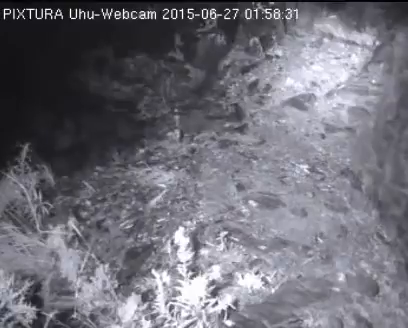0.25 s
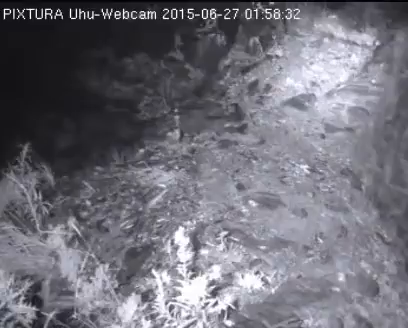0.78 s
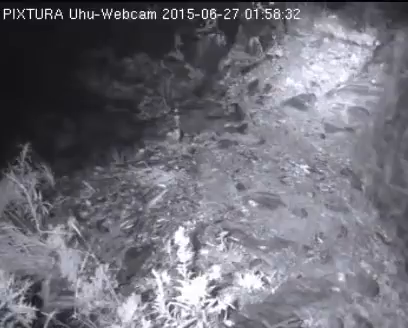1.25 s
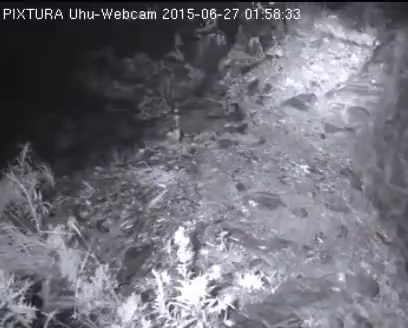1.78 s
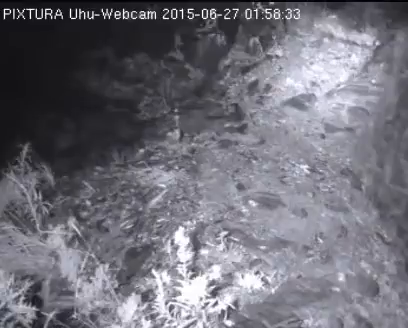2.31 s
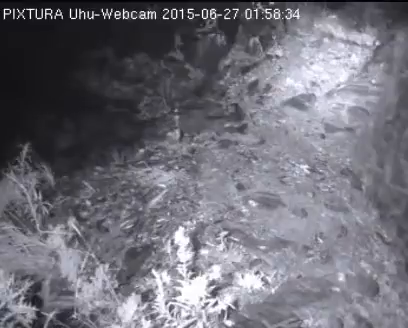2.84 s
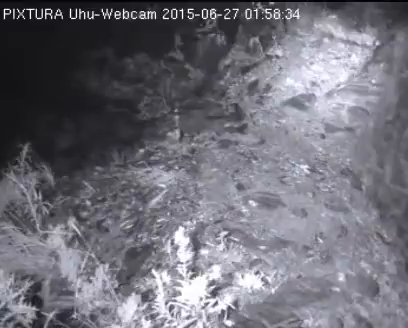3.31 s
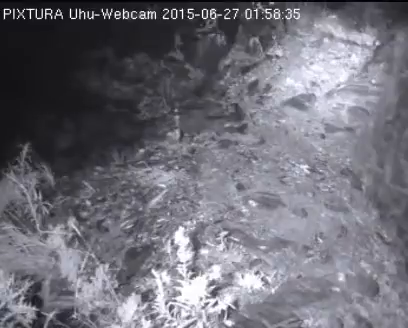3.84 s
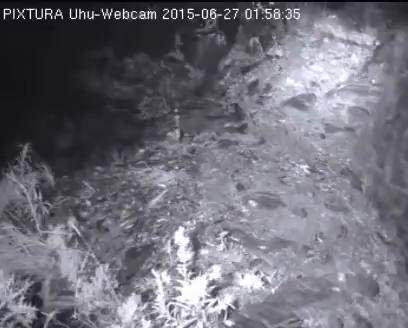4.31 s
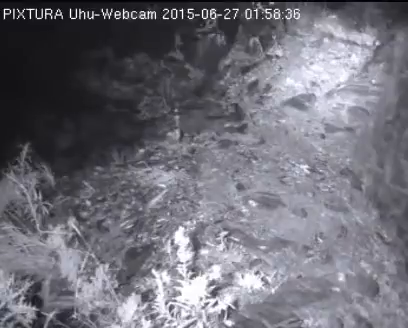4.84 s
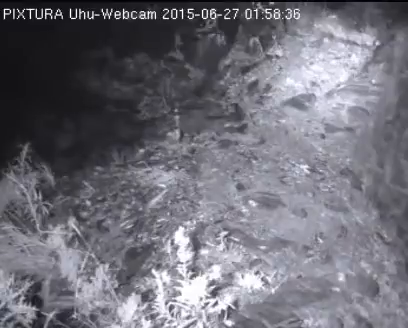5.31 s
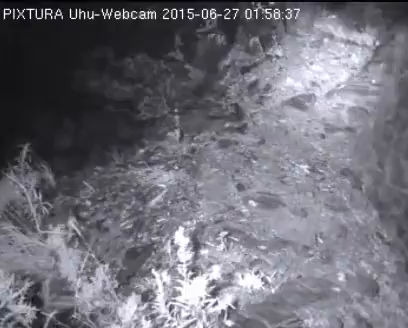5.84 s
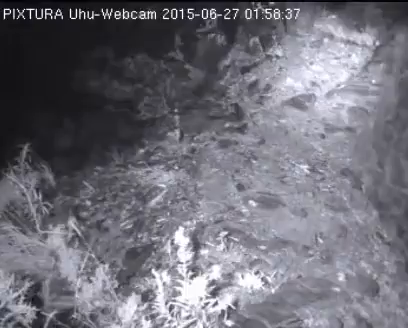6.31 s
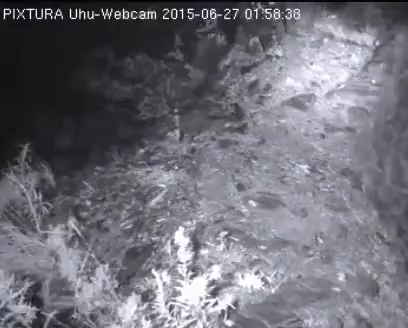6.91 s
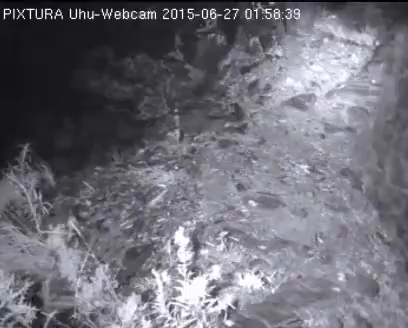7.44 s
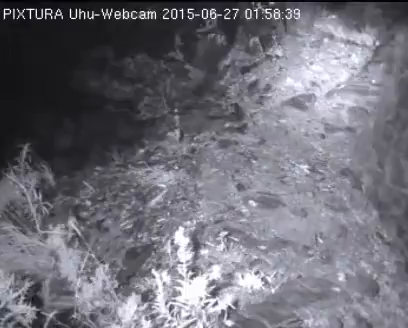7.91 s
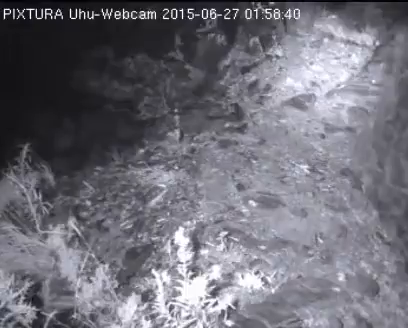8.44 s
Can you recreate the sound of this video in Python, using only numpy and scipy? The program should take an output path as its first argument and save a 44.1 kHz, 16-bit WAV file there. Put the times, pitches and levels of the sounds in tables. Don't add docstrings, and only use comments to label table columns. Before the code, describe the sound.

Young owls beg on a rocky slope at night. After quiet hiss, a short hoarse rasp comes, with a faint gasp just after; a second, similar rasp follows about a second later. A long pause holds only a tiny tick, then one much louder, harsher rasp distorts the input. Close rocks add brief reflections. A cheap outdoor camera microphone gives dull treble, steady hiss and low hum.

```python
import sys
import numpy as np
from scipy import signal
from scipy.fft import rfft, irfft
from scipy.io import wavfile
from scipy.ndimage import uniform_filter1d

SR = 44100
rng = np.random.default_rng(int(sys.argv[2]) if len(sys.argv) > 2 else 0)


def materialize(psi):
    bounded = np.clip(np.atleast_2d(psi).T, -1, 1)
    quanta = np.round(bounded * 32767).astype(np.int16)
    wavfile.write(sys.argv[1], SR, quanta)


def voltage_ratio(decibels):
    exponent = np.asarray(decibels, float) / 20
    return 10 ** exponent


N = 382788

# (full effort reached [s], held [s], effort [dB], syrinx pitch [Hz], release [dB/s])
RASPS = [
    (2.512, .1, -18, 1035, 250),
    (3.852, .078, -19.5, 985, 162),
    (7.695, .09, -8.5, 1040, 390),
    (2.705, .04, -35.5, 1000, 148),
]
OWL = [0, 1, 2, 0]
# (note re effort [dB], whistle re effort [dB], lowest whistle [Hz], its climb [Hz],
# whistle end after full effort [s])
VOICING = [
    (-16, -7.5, 3670, 30, 0.067),
    (-16.5, 4, 2165, 115, 0.077),
    (-24, -4, 3430, 430, 0.08),
    (-31, -3, 3600, 28, .06),
]
# (level re effort when voiced [dB], loss when unvoiced [dB])
CHEST = [(2, 7), (-2, 9.5), (-5.5, 1), (-10, 2.5)]
# (centre [Hz], width [Hz], level [dB])
LOWER_THROAT = [
    [(1560, 450, -17), (1950, 150, -10.5), (2120, 104, -7), (2380, 300, 2.5)],
    [(1900, 170, -2), (2260, 260, 4.5)],
    [(1620, 350, -1.5), (2090, 660, -7), (2585, 280, 9.5)],
]
# (centre [Hz], width [Hz], level [dB])
UPPER_THROAT = [
    [(2746, 130, 1), (3110, 580, -4), (3680, 220, -4), (4000, 500, -10.5), (4780, 840, -14),
     (6850, 1600, -21)],
    [(2600, 360, 1.5), (3010, 230, 4.5), (3400, 460, 1.5), (4080, 670, -3.5), (4850, 1200, -12),
     (5600, 1400, -15.5)],
    [(2806, 290, -4), (3404, 490, -0.5), (3810, 270, 1), (4170, 420, -3.5), (5150, 1020, -9),
     (7150, 6900, -22)],
]
FAR_FACE_DB = [-14.5, -29, -23]
# (time [s], pitch [Hz], level [dB])
SQUEAK = [
    (4.012, 3000, -45),
    (4.025, 2600, -34),
    (4.04, 2010, -38),
    (4.052, 1800, -47),
]
# (time [s], peak level [dB])
TICKS = [
    (5.614, -29),
    (4.1, -36),
]
# (frequency [Hz], density [dB per Hz])
HISS = [(25, -36), (45, -11.5), (70, -12.5), (110, -5), (250, -5.5), (400, 0.26), (700, -3), (1400, -4.5),
        (2100, -7), (3300, -9.5), (4600, -12.5), (7000, -10.5), (9000, -13.5)]
# (centre [Hz], width [Hz], lift [dB])
HOUSING = [(1006, 120, 2), (1850, 85, 4.5), (497, 26, 2)]
MAINS_ORDERS = [1, 3, 5, 7, 11, 13, 15]
MAINS_DB = [-45, -33, -51.5, -51, -73, -52, -60.5]
MACHINE_HZ = [46.8, 85.36, 93.65, 166.8, 170.75, 174.65, 199.3, 213.45]
MACHINE_DB = [-61, -59.5, -55.5, -57.5, -52, -68.5, -56, -61.5]
# (time [s], pitch [Hz], level [dB])
ENGINE = [(0, 62, -52), (1, 60.5, -51), (3, 62, -50), (5, 63.5, -49.5), (6.5, 65.5, -50), (7.2, 64, -58),
          (8.7, 62, -61)]

LEAD_S, SPAN_S = 0.08, 0.4
ATTACK_DB_PER_S, ATTACK_BEND = 699, 1.55
VOICE_IN_S, VOICE_OUT_S, NOTE_IN_S, NOTE_EARLY_S = 0.037, 0.018, 0.07, 0.016
PITCH_SAG = 0.035
UNVOICED_NOTE_DB, UNVOICED_WHISTLE_DB = -14, -10
WHISTLE_DIP_S, WHISTLE_IN_S = 0.015, 0.078
MAINS_HZ = 49.987
MIC_EDGE_HZ, CLIP, LINK_HZ = 7600, 0.72, 10600


def level(x, db):
    return x * voltage_ratio(db) / np.sqrt(np.mean(x ** 2))


def curves(table, s):
    rows = np.array(table, float)
    return [np.interp(s, rows[:, 0], column) for column in rows[:, 1:].T]


def walk(rate, count):
    k = int(SR / rate)
    held = np.repeat(rng.standard_normal(count // k + 1), k)[:count]
    return 1.274 * uniform_filter1d(uniform_filter1d(held, k), k)


def ring(x, hz, width_hz):
    return signal.lfilter(*signal.iirpeak(hz, hz / width_hz, SR), x)


def controls(row, voicing, chest):
    full, held, db, pitch_hz, release = row
    note_db, whistle_db, whistle_hz, climb_hz, lasts_s = voicing
    voiced_db, chest_loss_db = chest
    start = int((full - LEAD_S) * SR)
    stop = start + int(SPAN_S * SR)
    s = np.arange(start, stop) / SR - full
    rise_db = ATTACK_DB_PER_S * LEAD_S * np.clip(-s / LEAD_S, 0, 1) ** ATTACK_BEND
    effort_db = db - rise_db - release * np.clip(s - held, 0, None)

    def slack(at_full, in_s, until_s):
        return np.clip(np.maximum(at_full - s / in_s, (s - until_s) / VOICE_OUT_S), 0, 1)

    note_slack = slack(0.447, NOTE_IN_S, held - NOTE_EARLY_S)
    chest_slack = slack(0.55, VOICE_IN_S, held)
    whistle_slack = slack(0.21, WHISTLE_IN_S, lasts_s)
    climb = np.clip(np.abs(s - WHISTLE_DIP_S) / (0.7 * held), 0, 1)
    climb = climb - 0.3 * np.clip((s - lasts_s) / VOICE_OUT_S + 0.5, 0, 1)
    return (start, stop, effort_db,
            pitch_hz * (1 - PITCH_SAG * note_slack),
            note_db + UNVOICED_NOTE_DB * note_slack,
            voiced_db - chest_loss_db * chest_slack,
            whistle_db + UNVOICED_WHISTLE_DB * whistle_slack,
            whistle_hz + climb_hz * climb)


def rasp(control, lower, upper, far_db, wobble=0.1, air_db=8.0, flutter_db=0.94):
    start, stop, effort_db, hz, note_db, lower_db, whistle_db, whistle_hz = control
    n = stop - start
    turns = np.cumsum(hz * (1 + wobble * walk(600, n))) / SR
    pulses = np.exp(4 * np.cos(2 * np.pi * turns)) * voltage_ratio(2.5 * walk(900, n))
    syrinx = level(np.diff(pulses, prepend=pulses[0]), 0)
    air = level(rng.standard_normal(n), air_db)
    source = (syrinx + air) * voltage_ratio(flutter_db * walk(150, n))
    voice = throat(source, upper) + voltage_ratio(lower_db) * throat(source, lower)
    whistle = voltage_ratio(whistle_db) * wavering(whistle_hz, spread=0.01825, rate=170, shake_db=2.5)
    note = voltage_ratio(note_db + 3.5) * wavering(hz, spread=0.022, rate=120, shake_db=3.0)
    effort = voltage_ratio(effort_db) * signal.windows.tukey(n, 0.1)
    echoed, straight = np.zeros((2, N))
    echoed[start:stop] = voice * effort
    straight[start:stop] = (note + whistle) * effort
    return rocks(echoed, far_db) + straight


def throat(x, modes):
    out = np.zeros(len(x))
    for k, (hz, width_hz, db) in enumerate(modes):
        steep = ring(ring(x, hz, 1.0 * width_hz), hz, 1.0 * width_hz)
        out += (-1) ** k * voltage_ratio(db) * steep
    return level(out, 0)


def wavering(hz, spread, rate, shake_db):
    turns = np.cumsum(hz * (1 + spread * walk(rate, len(hz)))) / SR
    return np.sqrt(2) * np.sin(2 * np.pi * turns) * voltage_ratio(shake_db * walk(rate, len(hz)))


def squeak():
    s = np.arange(N) / SR
    hz, db = curves(SQUEAK, s)
    sounding = (s > SQUEAK[0][0]) & (s < SQUEAK[-1][0])
    return sounding * voltage_ratio(db + 3 * walk(200, N)) * np.sin(2 * np.pi * np.cumsum(hz) / SR)


def ticks(decay_s=0.0063):
    out, s = np.zeros(N), np.arange(800) / SR
    for at, db in TICKS:
        start = int(at * SR)
        out[start:start + len(s)] += voltage_ratio(db) * rng.standard_normal(len(s)) * np.exp(-s / decay_s)
    return 3.1 * ring(ring(out, 1300, 2600), 1300, 3600)


def rocks(x, far_db, near_db=-5, near_t60=0.13, far_t60=1.5):
    s = np.arange(SR) / SR
    near = rng.standard_normal(SR) * 1000.0 ** (-s / near_t60)
    far = rng.standard_normal(SR) * 1000.0 ** (-s / far_t60)
    echoes = voltage_ratio(near_db) * near / np.linalg.norm(near) + voltage_ratio(far_db) * far / np.linalg.norm(far)
    return x + signal.fftconvolve(x, echoes)[:N]


def hiss():
    hz = np.arange(N // 2 + 1) * SR / N + 1e-9
    db, = curves([(np.log(f), d) for f, d in HISS], np.log(hz))
    for centre, width, lift in HOUSING:
        db = db + lift / (1 + (2 * (hz - centre) / width) ** 2)
    noise = irfft(rfft(rng.standard_normal(N)) * voltage_ratio(db), N)
    return level(noise, -31.5) * voltage_ratio(0.44 * walk(3.015, N))


def tone(turns, db):
    return np.sqrt(2) * voltage_ratio(db) * np.sin(2 * np.pi * (turns + rng.random()))


def hum():
    s = np.arange(N) / SR
    out = np.zeros(N)
    for order, db in zip(MAINS_ORDERS, MAINS_DB):
        out += tone(order * MAINS_HZ * s, db)
    for hz, db in zip(MACHINE_HZ, MACHINE_DB):
        out += tone(hz * s + 0.05 * walk(1.4, N), db + 3.0 * walk(2.7, N))
    hz, db = curves(ENGINE, s)
    return out + tone(np.cumsum(hz) / SR, db + 2.2 * walk(4, N))


def scene():
    owls = np.zeros(N)
    for row, voicing, chest, k in zip(RASPS, VOICING, CHEST, OWL):
        owls += rasp(controls(row, voicing, chest), LOWER_THROAT[k], UPPER_THROAT[k], FAR_FACE_DB[k])
    small_noises = rocks(squeak() + ticks(), far_db=-22)
    return (voltage_ratio(-2.0) * owls + small_noises + hiss() + hum())[None]


def top_cut(x):
    return signal.sosfilt(signal.butter(12, 15660, fs=SR, output="sos"), x)


def record(dry, headroom=1.04):
    rolloff = signal.firwin(45, MIC_EDGE_HZ, window=("kaiser", 8), fs=SR)
    dull = np.roll(signal.lfilter(rolloff, 1, dry), -22, axis=1)
    clipped = np.clip(dull, -CLIP, CLIP)
    grain = voltage_ratio(-87.5) * rng.standard_normal(dry.shape)
    link = signal.butter(10, LINK_HZ, fs=SR, output="sos")
    sent = signal.sosfiltfilt(link, clipped + grain)
    return top_cut(np.clip(sent, -headroom * CLIP, headroom * CLIP))


dry = scene()
out = record(dry)
materialize(out)
```